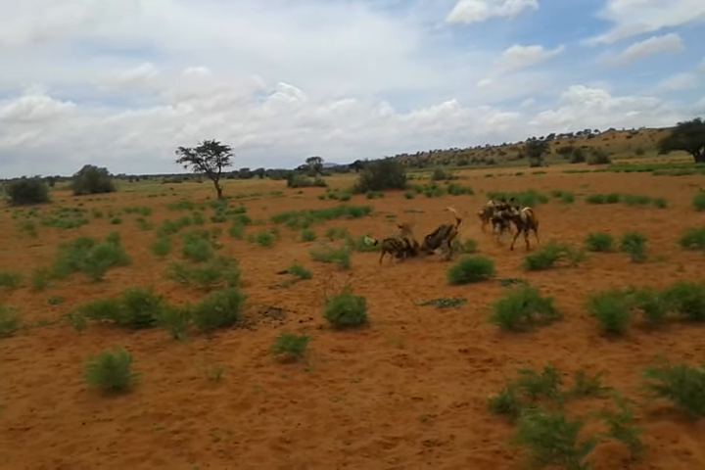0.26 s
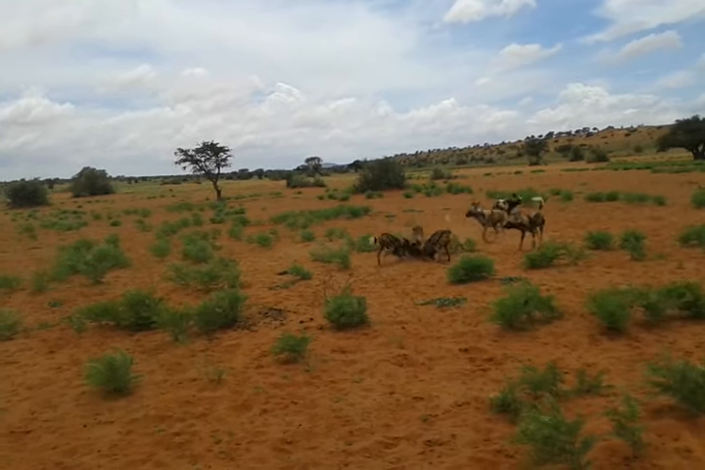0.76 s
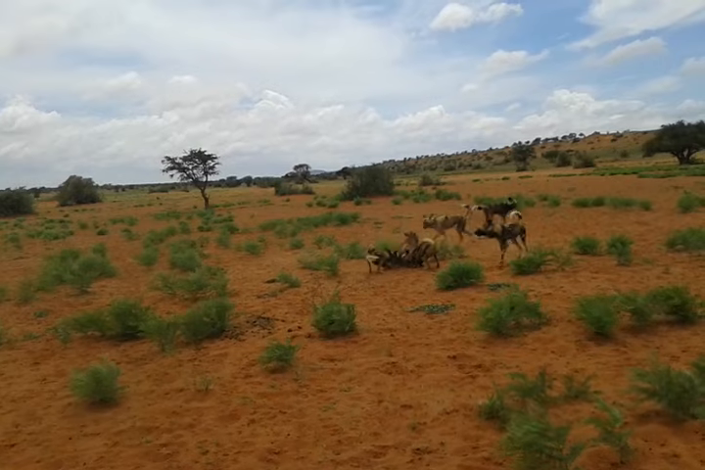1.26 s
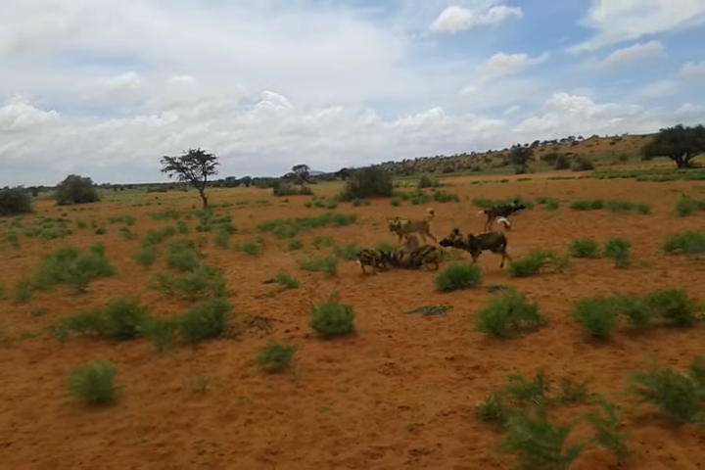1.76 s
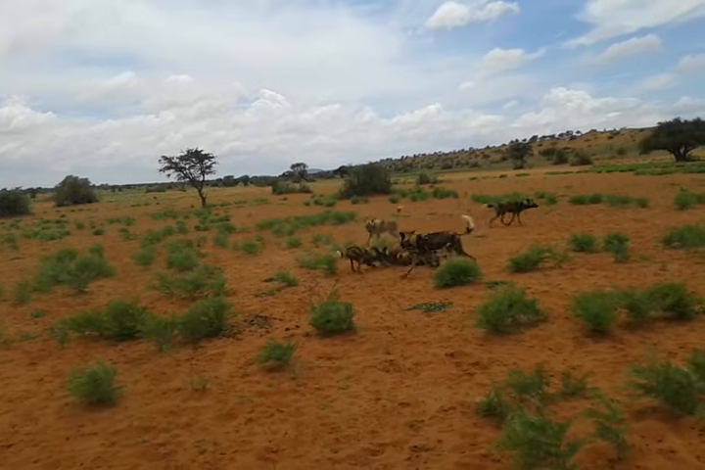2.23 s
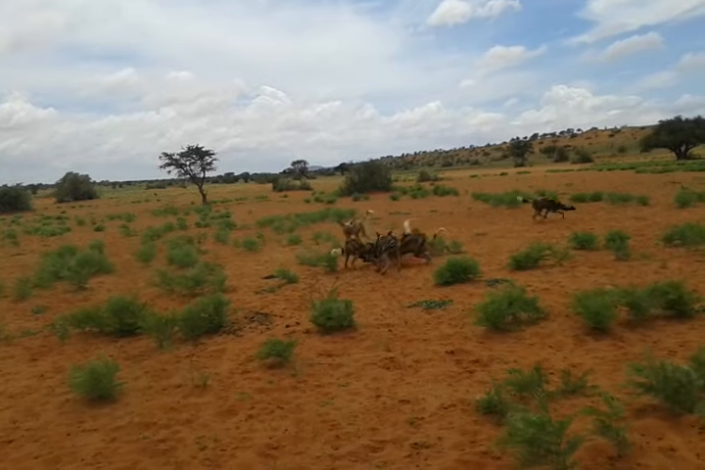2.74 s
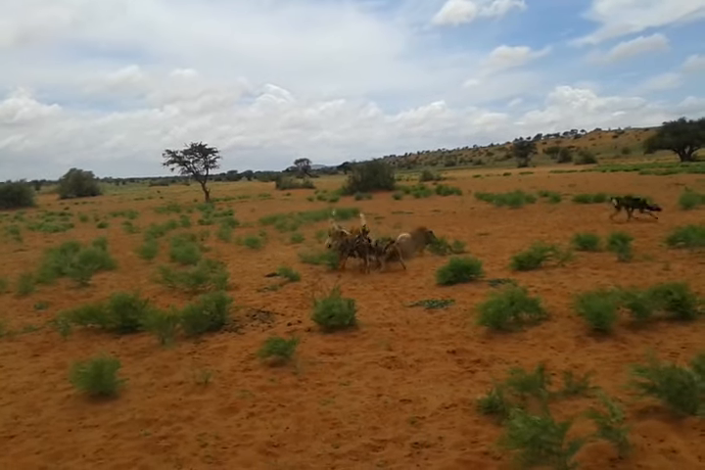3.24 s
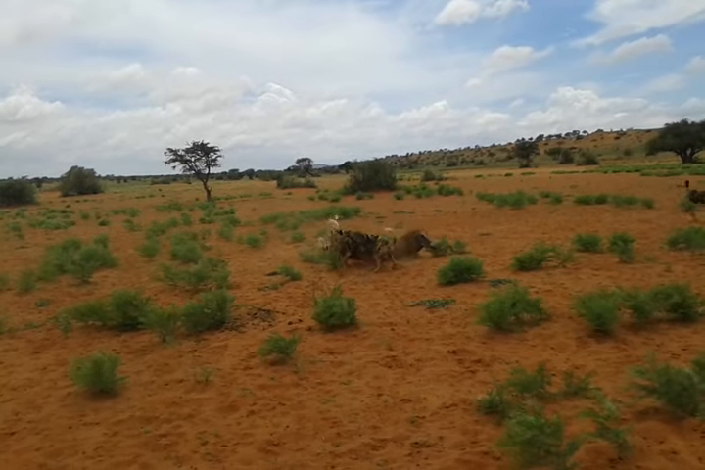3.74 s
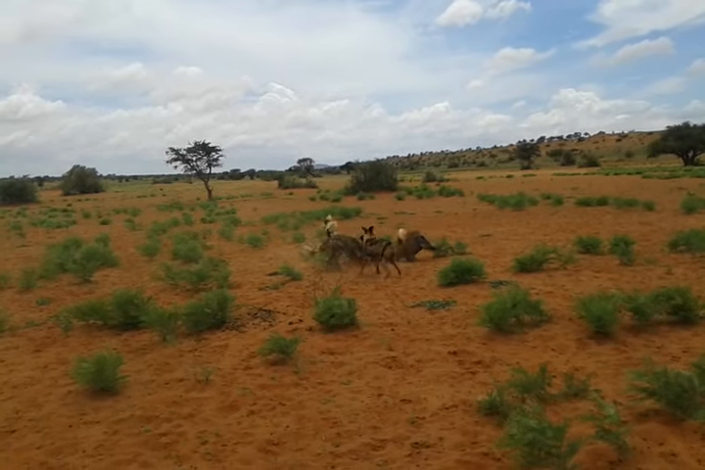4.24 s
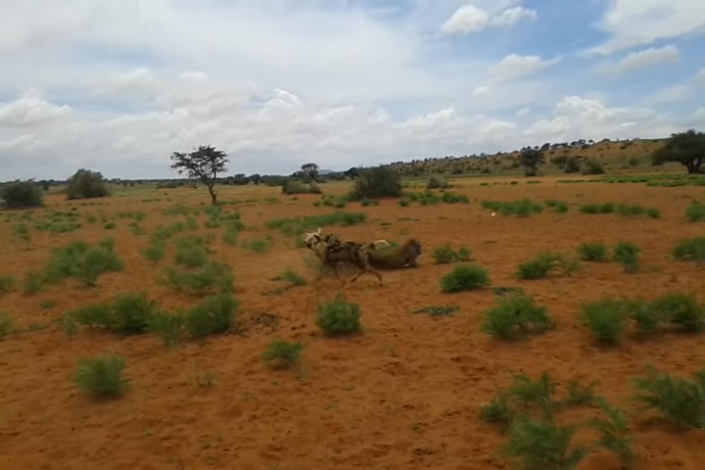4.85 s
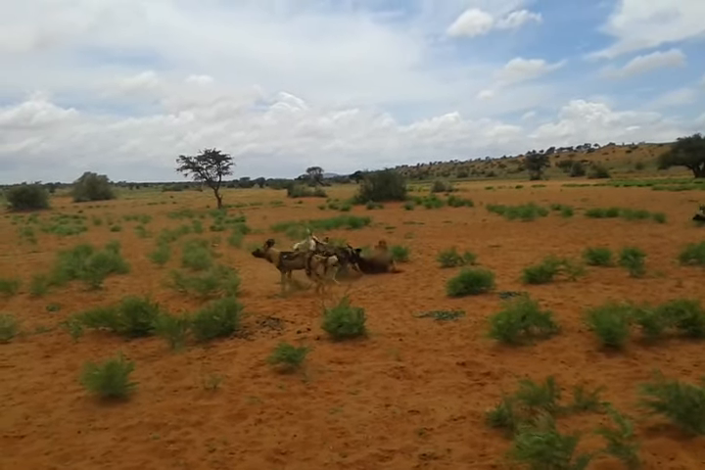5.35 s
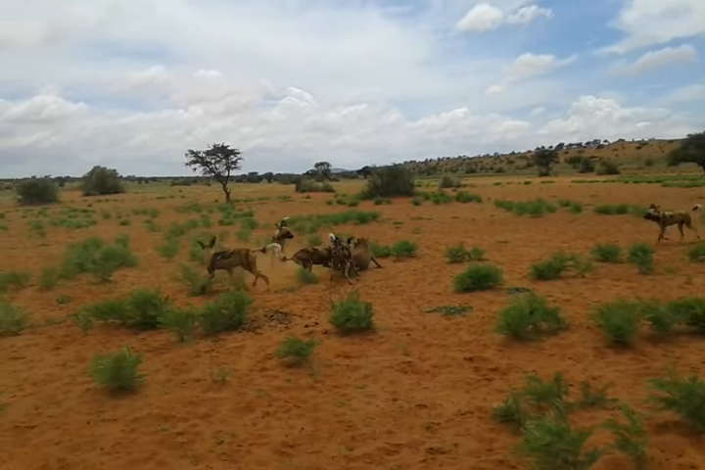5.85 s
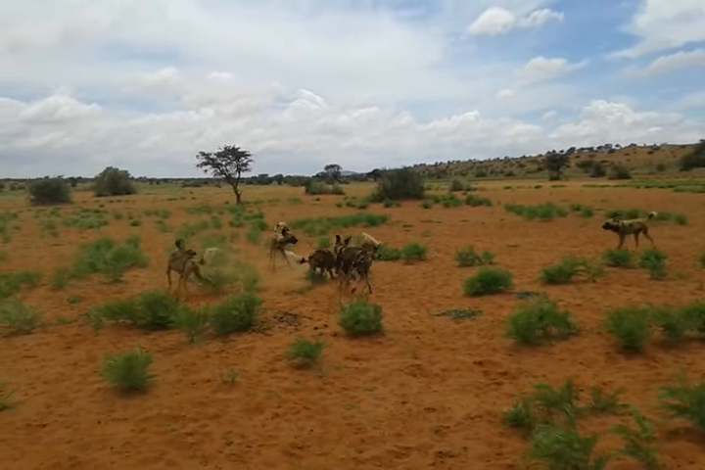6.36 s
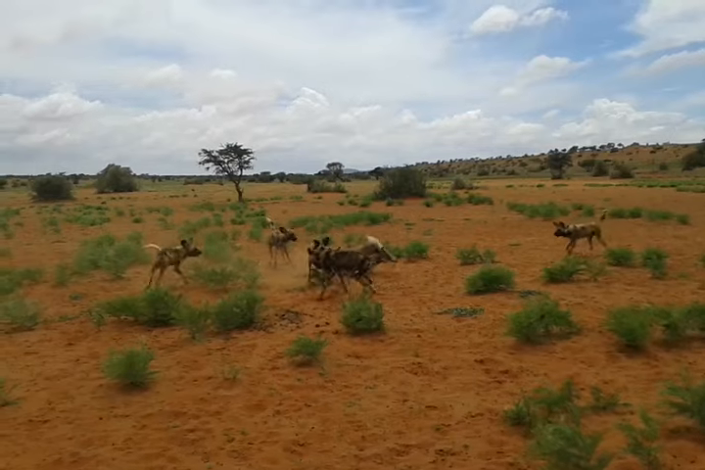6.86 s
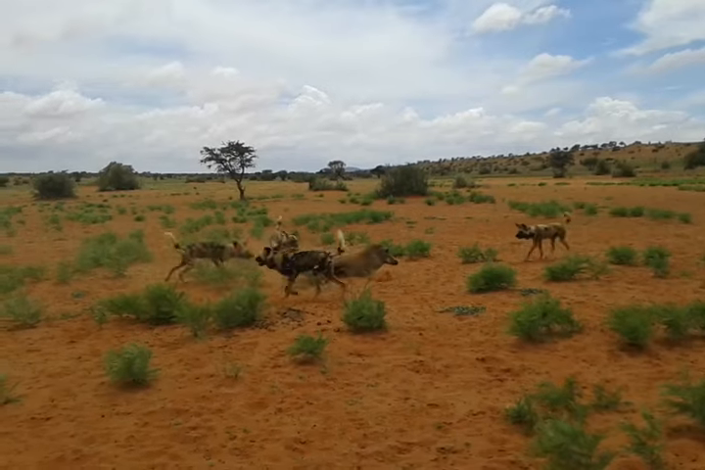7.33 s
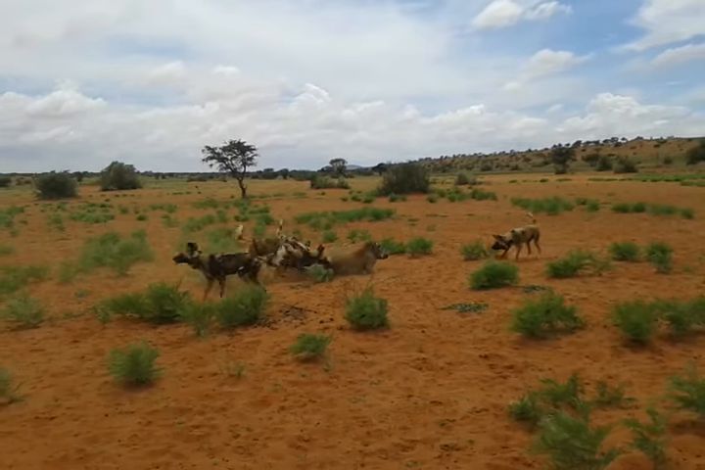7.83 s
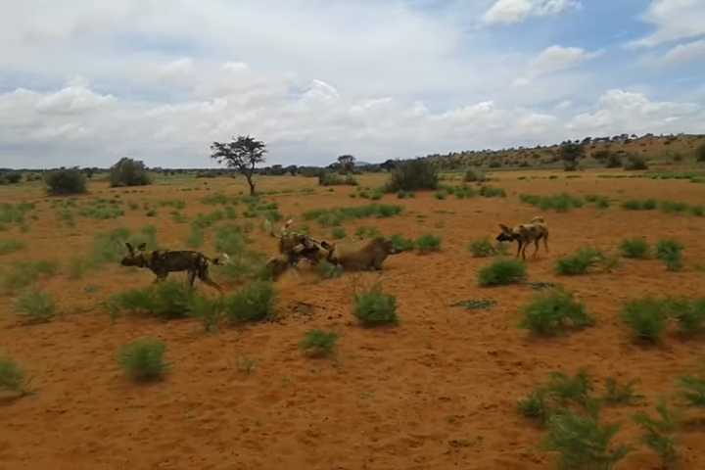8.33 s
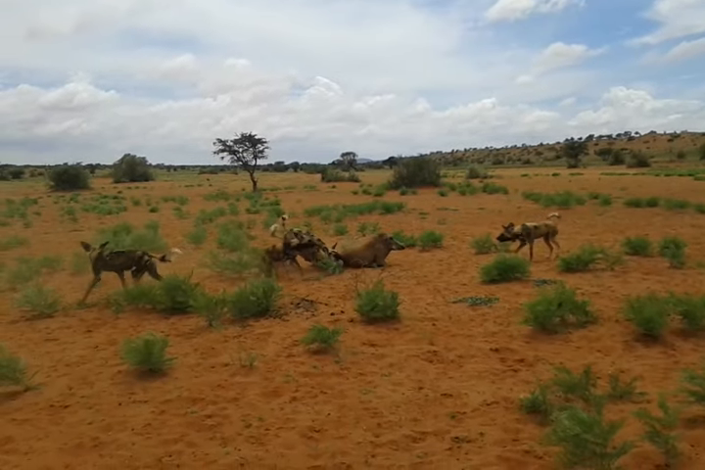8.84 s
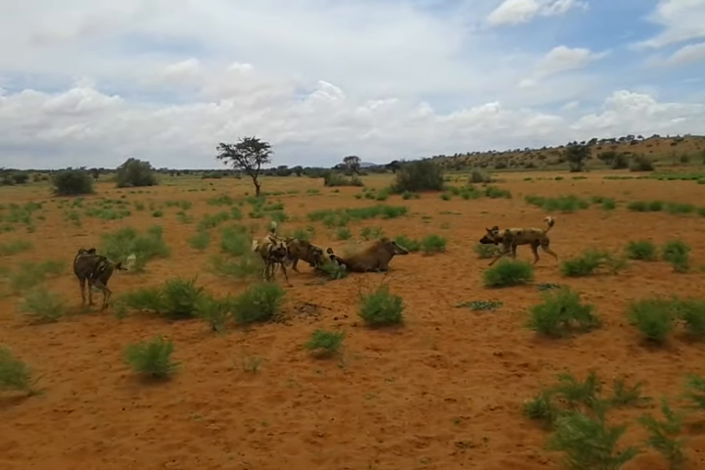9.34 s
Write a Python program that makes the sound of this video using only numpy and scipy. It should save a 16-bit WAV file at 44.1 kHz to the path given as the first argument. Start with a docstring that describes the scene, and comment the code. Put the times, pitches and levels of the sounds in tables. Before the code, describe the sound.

Some way off on open sand, a warthog held by wild dogs gives short, rough grunts, four or five a second. About halfway through it lets out one high, raspy squeal, then grunts harder before thinning out near the end. Faint scuffling, two tiny yelps, a few snapping stalks and faint bird chirps lie underneath. Wind gusts and dull thumps buffet a hissy hand-held microphone.

```python
"""A warthog, pinned by wild dogs on open sand some way off, grunts four or five times a second, squealing once.
Each grunt is a source-filter sound: two or three slow throat pulses ring the resonances of the airway.
The squeal is a high whistle modulated by a lower voice. Paws scuffle, the pack yelps faintly,
a small bird chirps, low thumps sound, and gusts buffet a hissy hand-held microphone."""
import sys
import numpy as np
from scipy import signal
from scipy.fft import rfft, irfft, next_fast_len
from scipy.io import wavfile
from scipy.ndimage import uniform_filter1d

SR = 44100
rng = np.random.default_rng(int(sys.argv[2]) if len(sys.argv) > 2 else 0)


def transcribe(u):
    """Save the signal u as a 16-bit wav file named by the first command-line argument.

    u: samples, shape (n,) or (channels, n), limited to [-1, 1]; the rate is SR.
    q: integer samples, one column per channel.
    """
    v = np.clip(np.atleast_2d(u).T, -1, 1)
    q = np.round(v * 32767).astype(np.int16)
    wavfile.write(sys.argv[1], SR, q)


N = 422919
TIME = np.arange(N) / SR

# grunts: t/s, throat level/dB, open-mouth brightness/dB, second pulse/dB, drawn out (0-1), throat f/Hz
GRUNT_EVENTS = [(.126, -62, -19, -8.5, 0.07, 694), (0.298, -52, -11, 0, 0.15, 788),
                (.514, -59.5, 2, -1.5, 0, 805), (0.682, -43.5, 0.5, 2, 0.87, 700),
                (0.884, -48, -8, -4, 0.15, 875), (1.109, -52.5, -3, 5, 0.34, 726),
                (1.303, -47.5, -4, 0.5, 0.07, 820), (1.5, -44.5, -5, 5.5, .55, 690),
                (1.548, -52, 0, -5, 0.23, 745), (1.73, -53.5, -0.5, -5, 0.13, 978),
                (2.017, -57, -10, -2, 0.4, 825), (2.436, -50, -3.5, 4, 0.92, 835),
                (2.666, -52.5, 4.5, -11, 0.15, 646), (2.879, -55, -2.5, -2, 0.37, 914),
                (3.083, -52, 5, -1, 0.24, 900), (3.318, -55, 2.5, -2, 0.07, 865),
                (3.525, -45.5, 2, 3, 0.54, 880), (3.697, -56, 3, -13, 0.67, 710),
                (3.932, -49.5, 4, 0, 0.27, 1020), (4.218, -48, 4, 2, 0.17, 830),
                (4.437, -48, 6, -8, 0.45, 684), (4.657, -48, 7.5, -1, 0.46, 730),
                (5.424, -45.5, -3.5, -12, 0.44, 670), (5.615, -41.5, 2, 0.5, 0.24, 692),
                (5.833, -42, -3, -3, 0.09, 923), (6.028, -47, -0.5, 3, 0.34, 656),
                (6.262, -47, -0.5, 2, 0, 990), (6.426, -45, 0, 6, 0.23, 720),
                (6.478, -42.5, 6.5, -0.5, 0.1, 900), (6.676, -44.5, 7, -4.5, 0.11, 718),
                (6.886, -39.5, -1.5, -6.5, 0.33, 1080), (7.109, -51, 3.5, -2, 0.21, 930),
                (7.316, -51, 2, -1.5, 0.16, 1150), (7.763, -42, 0.5, -10, 0.22, 837),
                (8.06, -53, 0.5, 3, 0.96, 718), (8.274, -49.5, -4, -3.5, 0.43, 660),
                (9.119, -52, 5.5, 3.5, 1, 755)]
# airway resonances: f/Hz, bandwidth/Hz, relative level/dB
THROAT_MODES = [(399, 69.4, 2), (549.4, 64, -4), (702.4, 14.5, -10.5), (963, 34, -15)]
MOUTH_MODES = [(1152, 53, -5), (1440, 50, 0), (1935, 410, -10)]
SNOUT_MODES = [(2680, 350, 2), (3190, 300, 0.5), (3747, 136, -1), (4640, 530, -9), (7300, 4900, -6.5)]
# growth with effort: level in a usual grunt/dB, dB per dB of throat level, share of the brightness
MOUTH_GROWTH = (-61.5, 1.6, 1.0)
SNOUT_GROWTH = (-66, 0.45, 0.64)
USUAL_GRUNT_DB, PULSE_SPACING_S = -46.5, 0.028
MOUTH_RING_HZ, JAW_SPREAD = 1980, 0.13  # the jaw moves this resonance; spread in log frequency
# clear notes where a grunt catches the voice: t/s, starting f/Hz, level/dB
VOICED_NOTES = [(.72, 694, -46.5), (1.535, 449.5, -36), (2.695, 684, -62), (3.562, 740, -49.5),
                (4.415, 1430, -50), (5.46, 694, -41.5), (5.652, 706, -42), (6.07, 668, -45),
                (6.455, 438, -32.5), (6.484, 2745, -43.5)]

# squeal: t/s, nominal whistle f/Hz, voice f/Hz, whistle level/dB, overtone level/dB, roughness (0-1)
SQUEAL_CONTOUR = [(4.73, 1465, 358.3, -69, -60, 0.86), (4.765, 1680, 347, -47.5, -41.5, 0.3),
                  (4.825, 1810, 422.5, -46, -47, 0.77), (4.864, 1970, 416.3, -31.5, -38, 0.32),
                  (4.89, 1963, 415.5, -43.5, -47.5, 0.67), (4.94, 1996, 410.7, -41, -43.5, 0.3),
                  (4.985, 2003, 495, -52, -44, 0.34), (5.045, 2030, 482.5, -40.5, -51, 0.29),
                  (5.115, 2065, 463.8, -37, -57, 0.21), (5.145, 2220, 474.4, -36.5, -55, 0.17),
                  (5.208, 2162, 489, -32, -53.5, 0.25), (5.238, 2100, 499, -49.5, -51.5, 0.7),
                  (5.275, 2060, 459, -36, -58, 0.17), (5.303, 1858, 452, -63, -62, .5)]
# harmonics of the whistle above its octave, and of the low voice: harmonic number, relative level/dB
WHISTLE_HARMONICS = [(3, 5.5), (4, 3.5), (5, 0.5), (6, -4), (7, -7)]
VOICE_HARMONICS = [(1, 5), (2, -14), (3, -19)]
# resonances of the squeal's rasp: f/Hz, bandwidth/Hz, relative level/dB
RASP_MODES = [(430, 64, 10.5), (766, 100, 5.5), (1110, 42, 5), (1420, 330, 4.5), (2350, 580, -1.5),
              (4200, 610, -3.5)]
VOICE_DB, VOICE_AT_HZ, VOICE_DB_PER_OCTAVE = -39, 449, 22.5  # louder as it is pressed higher
RASP_DB, RASP_ROUGH_DB = -50.5, 6  # when clean; added by full roughness
UPPER_DB, UPPER_ROUGH_DB = -14, 11  # likewise for the upper harmonics, relative to the octave

# the pack's yelps and the bird's chirps: t/s, duration/s, starting f/Hz, final f/Hz, level/dB
DOG_YELPS = [(1.038, 0.023, 853, 735, -55.5), (1.41, 0.02, 814, 710, -52)]
BIRD_CHIRPS = [(3.03, .032, 6500, 8800, -60.5), (3.27, 0.031, 8200, 9400, -64),
               (4.345, 0.044, 6950, 7300, -65), (8.754, .03, 9700, 12800, -62),
               (8.784, 0.028, 6160, 9500, -57.5)]
# stalks snapping underfoot: t/s, peak level/dB
STALK_SNAPS = [(5.931, -47), (8.119, -50), (8.14, -46), (9.192, -45.5)]
# low thumps: t/s, envelope peak before the bass cut/dB, f/Hz
LOW_THUMPS = [(0.453, -29.5, 114), (1.295, -30, 97), (4.27, -22, 121), (4.282, -23.5, 164),
              (4.359, -24.5, 331), (4.483, -29.5, 162), (5.274, -21, 138), (5.284, -21, 138),
              (5.519, -23, 124.1), (5.708, -23.5, 124), (5.889, -26, 156), (6.45, -28, 158),
              (7.75, -31, 137), (8.273, -27.5, 214)]
# gusts at the microphone and bouts of scuffling: centre t/s, half-width/s, level/dB
WIND_GUSTS = [(.37, 0.48, -51.5), (.9, 0.44, -56.5), (1.28, 0.12, -48), (1.62, 0.54, -59.5),
              (2.0, 0.047, -44.5), (2.64, 0.058, -45.5), (3.25, 0.55, -55.5), (4.3, 0.092, -45.5),
              (4.52, 0.25, -50), (5.47, 0.21, -43.5), (5.82, 0.15, -42.5), (6.3, 0.078, -42),
              (6.8, 0.22, -48), (7.53, 0.15, -44.5), (7.79, 0.036, -42.5), (8.6, 0.24, -50.5),
              (9.06, 0.081, -54.5), (9.42, 0.5, -56)]
SCUFFLE_BOUTS = [(2.07, 0.077, -60.5), (5.6, 0.59, -63), (8.48, 0.13, -63)]
# noise spectra: f/Hz, relative density level/dB
WIND_SPECTRUM = [(30, -20), (70, 0), (130, -0.5), (200, -8), (300, -17.5), (450, -29), (700, -37)]
SAND_SPECTRUM = [(200, -5.5), (400, 3.5), (700, -6), (1200, -12.5), (2500, -15.5), (5000, -27)]
HISS_SPECTRUM = [(500, 1), (2000, 0.89), (5000, 0.19), (9000, 0.82), (14000, 0.99)]
BREEZE_DB, USUAL_WIND_DB = -63.5, -53.5  # the breeze persists between gusts
RUSTLE_DB, RUSTLE_SLOPE = -73, 0.54  # level in the usual wind; dB per dB of wind
HISS_DB, HISS_SLOPE = -69, 0.36  # likewise


def grunts(nominal_s=0.068, chest_db=-4):
    """Source and filter: pulses ring the airway; effort and an open mouth raise its upper modes."""
    out, t = np.zeros(N + SR), TIME[:SR // 5]
    for s, throat_db, bright_db, second_db, drawn_out, throat_hz in GRUNT_EVENTS:
        mouth_db, snout_db = (db + slope * (throat_db - USUAL_GRUNT_DB) + share * bright_db
                              for db, slope, share in (MOUTH_GROWTH, SNOUT_GROWTH))
        mouth_hz = MOUTH_RING_HZ * np.exp(JAW_SPREAD * rng.standard_normal())
        glottis = throat_pulses(t, second_db, drawn_out, snap=1.03, puff_s=0.0099, leak=0.51)
        breath = throat_pulses(t, second_db, drawn_out, snap=0.2, puff_s=0.0076, leak=0.53)
        throat_modes = reshaped(THROAT_MODES) + [(throat_hz, 35, -7)]
        mouth_modes = reshaped(MOUTH_MODES) + [(mouth_hz, 70, -1)]
        chest = butter(resonate(glottis, [(172, 37, 0)]), [90, 330], "band")
        throat = butter(resonate(glottis, throat_modes), [230, 1300], "band", order=3)
        mouth = butter(resonate(breath, mouth_modes), [1000, 2700], "band")
        snout = butter(resonate(breath, reshaped(SNOUT_MODES)), [2100, 5200], "band", order=3)
        at = int(s * SR)
        levels_db = (throat_db + chest_db, throat_db, mouth_db, snout_db)
        for part, db in zip((chest, throat, mouth, snout), levels_db):
            nominal_rms = np.sqrt(np.sum(part ** 2) / (nominal_s * SR))
            out[at:at + len(t)] += from_db(db) * part / nominal_rms
    return out[:N]


def throat_pulses(t, second_db, drawn_out, snap, puff_s, leak):
    """Pulse excitation: each opening gives a click and a puff; a drawn-out grunt also leaks air."""
    clicks, flow = np.zeros(len(t)), np.zeros(len(t))
    third_db = second_db - 25 + 23 * drawn_out
    sizes = from_db([0, second_db, third_db])
    for k, size in enumerate(sizes):
        age = t - 0.003 - k * PULSE_SPACING_S
        clicks[np.argmax(age >= 0)] += size
        flow += size * (age >= 0) * np.exp(-np.abs(age) / puff_s)
    flow += leak * drawn_out * sizes.max() * np.exp(-(t / PULSE_SPACING_S - 1.48) ** 2)
    return -snap * clicks + flow * rng.standard_normal(len(t)) / np.sqrt(puff_s * SR / 2)


def reshaped(modes, shift=0.03, spread_db=6):
    """Resonances follow geometry: the airway takes a slightly different shape for each grunt."""
    return [(hz * (1 + shift * rng.standard_normal()), width_hz, db + spread_db * rng.standard_normal())
            for hz, width_hz, db in modes]


def voiced_notes(length_s=0.058, sag=0.074):
    """Phonation: the voice catches briefly, and its pitch sags as the air runs out."""
    return glides([(s, length_s, hz, hz * (1 - sag), db) for s, hz, db in VOICED_NOTES], hoarseness=0.45)


def squeal(flutter_hz=300, jitter=0.0054, tearing=0.6, splitting=0.39, attack_s=0.0074, release_s=0.011):
    """Modulation: a low voice and a fluttering fold put sidebands around a simultaneous whistle."""
    whistle_hz, voice_hz, whistle_db, overtones_db, rough = in_time(SQUEAL_CONTOUR)
    whistle_phase = phase_of(whistle_hz * (1 + jitter * (0.25 + 2 * rough) * wobble(160)))
    voice_phase = phase_of(voice_hz * (1 + 0.0249 * rough * wobble(77.6)))
    flutter_phase = phase_of(flutter_hz * (1 + 0.071 * wobble(60.5)))
    sidebands = rough * (0.28 * np.exp(1j * flutter_phase) + 0.13 * np.exp(-1j * flutter_phase))
    sidebands += 0.17 * np.cos(voice_phase)
    half_step = np.exp(0.5j * flutter_phase)  # shifts a tone up by half the flutter rate

    def partial(k):
        """Random modulation adds noise bands just above partial k, stronger as k rises."""
        smear = rough * (1 + 0.41 * (k - 1) ** 2)
        split = half_step * (narrowband(39) + half_step * narrowband(30))
        torn = half_step ** min(k, 3) * narrowband(200 + 45 * k)
        modulation = 1 + sidebands + smear * (tearing * torn + splitting * split)
        return np.real(np.exp(1j * k * whistle_phase) * modulation) * np.sqrt(2 / (1 + smear ** 2))

    upper = rms_one(sum(from_db(db) * partial(k) for k, db in WHISTLE_HARMONICS))
    upper *= from_db(UPPER_DB + UPPER_ROUGH_DB * rough)
    whistle = from_db(whistle_db) * partial(0.98)  # the lowest partial lies 2% flat
    whistle += from_db(overtones_db) * (partial(2) + upper)
    voice = sum(from_db(db) * np.cos(k * voice_phase) for k, db in VOICE_HARMONICS)
    voice *= 1 + 1.29 * rough * wobble(80)
    voice += 0.19 * np.cos(flutter_phase) + 0.13 * np.cos(flutter_phase + voice_phase)
    voice_db = VOICE_DB + VOICE_DB_PER_OCTAVE * np.log2(voice_hz / VOICE_AT_HZ)
    pulsed_breath = rng.standard_normal(N) * (1 + np.cos(voice_phase))
    rasp = butter(resonate(pulsed_breath, RASP_MODES), [250, 4500], "band")
    rasp_db = RASP_DB + RASP_ROUGH_DB * rough
    start_s, end_s = SQUEAL_CONTOUR[0][0], SQUEAL_CONTOUR[-1][0]
    envelope = np.clip(np.minimum((TIME - start_s) / attack_s, (end_s - TIME) / release_s), 0, 1)
    return envelope * (whistle + from_db(voice_db) * rms_one(voice) + from_db(rasp_db) * rms_one(rasp))


def yelps():
    """Frequency jitter roughens the short falling calls of the dogs."""
    return glides(DOG_YELPS, hoarseness=0.7)


def chirps():
    """Fast upward frequency sweeps form the calls of a small bird."""
    return glides(BIRD_CHIRPS, hoarseness=0.16)


def snaps(decay_s=0.0052, band_hz=(516, 2600)):
    """Brittle fracture: a dry stalk breaks with an exponentially decaying burst of noise."""
    out, t = np.zeros(N + SR), TIME[:SR // 10]
    for s, db in STALK_SNAPS:
        crack = butter(rng.standard_normal(len(t)) * np.exp(-t / decay_s), band_hz, "band", order=1)
        at = int(s * SR)
        out[at:at + len(t)] += from_db(db) * crack / np.abs(crack).max()
    return out[:N]


def thumps(cycles=0.95):
    """Heavily damped oscillation: dull knocks of pressure die within a cycle or two."""
    out, t = np.zeros(N + SR), TIME[:SR // 10]
    for s, db, hz in LOW_THUMPS:
        turns, at = t * hz, int(s * SR)
        swell = 2 * turns / cycles
        out[at:at + len(t)] += from_db(db) * swell * np.exp(1 - swell) * np.sin(2 * np.pi * turns)
    return out[:N]


def wind(wind_db, lumpiness_db=4.8):
    """Turbulence: eddies at the microphone make a lumpy rumble."""
    rumble = evened(coloured_noise(WIND_SPECTRUM), seconds=0.095)
    return from_db(wind_db) * rumble * from_db(lumpiness_db * wobble(13.3))


def sand(wind_db, unevenness_db=3.2):
    """Incoherent sources add in power: scuffling paws, and sand and grass stirred by the wind."""
    rustle = from_db(RUSTLE_DB + RUSTLE_SLOPE * (wind_db - USUAL_WIND_DB))
    stirring = np.sqrt(swells(SCUFFLE_BOUTS) + rustle ** 2)
    return stirring * from_db(unevenness_db * wobble(31)) * coloured_noise(SAND_SPECTRUM)


def hiss(wind_db):
    """Steady broadband hiss: its level rises and falls along with the wind's, by a fixed number of dB per dB."""
    return from_db(HISS_DB + HISS_SLOPE * (wind_db - USUAL_WIND_DB)) * coloured_noise(HISS_SPECTRUM)


def bushes(x, echo_db=-21, t60_s=0.15, dull_hz=3000):
    """Scattering: on open ground, shrubs add only a faint, short tail to the direct sound."""
    t = TIME[:SR // 3]
    tail = butter(rng.standard_normal(len(t)) * (t > 0.008) * from_db(-60 * t / t60_s), dull_hz, "low")
    return x + from_db(echo_db) * signal.fftconvolve(x, tail / np.sqrt(np.sum(tail ** 2)))[:N]


def glides(rows, hoarseness):
    """Frequency modulation: short tones glide along a parabola, with random jitter."""
    out = np.zeros(N)
    for s, length_s, start_hz, end_hz, db in rows:
        u = np.linspace(0, 1, int(length_s * SR))
        hz = (start_hz + (end_hz - start_hz) * u ** 2) * (1 + hoarseness * rng.standard_normal(len(u)))
        at = int(s * SR)
        out[at:at + len(u)] += from_db(db) * np.sin(np.pi * u) * np.sin(phase_of(hz))
    return out


def resonate(x, modes):
    """Modal superposition: two-pole resonances add in parallel with alternating signs."""
    out = 0
    for k, (hz, width_hz, db) in enumerate(modes):
        r = np.exp(-np.pi * width_hz / SR)
        feedback = [1, -2 * r * np.cos(2 * np.pi * hz / SR), r * r]
        out += (-1) ** k * from_db(db) * (1 - r * r) / 2 * signal.lfilter([1, 0, -1], feedback, x)
    return out


def coloured_noise(spectrum):
    """Spectral shaping of white noise, falling away beyond both end points; rms 1."""
    hz, db = np.transpose(spectrum)
    size = next_fast_len(N)
    f = np.arange(size // 2 + 1) * SR / size + 1e-3
    skirts = np.minimum(f / hz[0], 1) ** 2 * np.minimum(hz[-1] / f, 1) ** 2
    gain = from_db(np.interp(np.log(f), np.log(hz), db)) * skirts
    return rms_one(irfft(rfft(rng.standard_normal(size)) * gain, size)[:N])


def narrowband(width_hz):
    """Line broadening: a random complex envelope spreads a tone into a steep-sided band; rms 1."""
    return rms_one(butter(rng.standard_normal((2, N)), width_hz, "low", order=4)).T @ [1, 1j] / np.sqrt(2)


def wobble(rate_hz):
    """Low-passed noise gives slow random motion; rms 1."""
    return rms_one(butter(rng.standard_normal(N), rate_hz, "low"))


def swells(rows):
    """Gaussian swells add in power."""
    return sum(from_db(db) ** 2 * np.exp(-np.minimum(((TIME - s) / half_s) ** 2, 50))
               for s, half_s, db in rows)


def evened(x, seconds):
    """Division by the running rms removes slow swings of level."""
    size = int(seconds * SR)
    return x / np.sqrt(uniform_filter1d(uniform_filter1d(x * x, size), size) + 1e-9)


def butter(x, hz, kind, order=2):
    """Causal, maximally flat filtering."""
    return signal.sosfilt(signal.butter(order, hz, kind, fs=SR, output="sos"), x)


def in_time(rows):
    """Linear interpolation of each column to every sample."""
    s, *columns = np.transpose(rows)
    return [np.interp(TIME, s, column) for column in columns]


def phase_of(hz):
    """Phase is the integral of frequency."""
    return 2 * np.pi * np.cumsum(hz) / SR


def rms_one(x):
    """Normalisation to rms 1."""
    return x / np.sqrt(np.mean(x ** 2) + 1e-20)


def from_db(db):
    """Amplitude ratio of a level in decibels."""
    return 10 ** (np.asarray(db) / 20)


def scene():
    """Superposition of distant animals and nearby wind at one microphone."""
    wind_db = 10 * np.log10(from_db(BREEZE_DB) ** 2 + swells(WIND_GUSTS))
    distant = grunts() + voiced_notes() + squeal() + snaps() + yelps() + chirps()
    knocks = butter(thumps(), 75, "high")  # the microphone passes little of their deep bass
    return (bushes(distant) + knocks + wind(wind_db) + sand(wind_db) + hiss(wind_db))[None]


def record(dry, cutoff_hz=14000):
    """Band limiting: an elliptic low-pass cuts the top steeply."""
    return signal.sosfilt(signal.ellip(12, 0.2, 70, cutoff_hz, fs=SR, output="sos"), dry)


dry = scene()
out = record(dry)
transcribe(out)
```